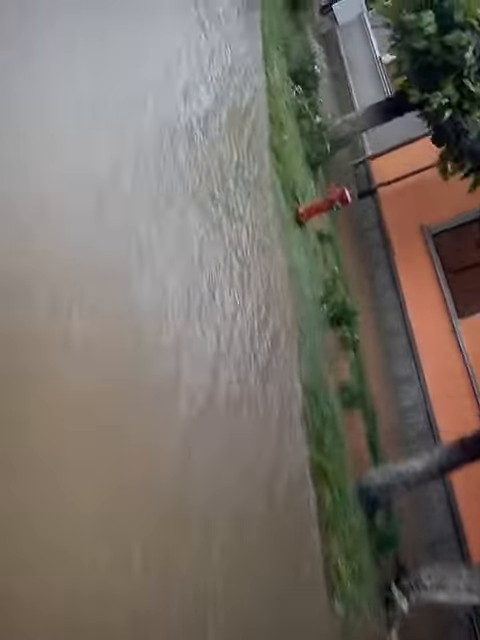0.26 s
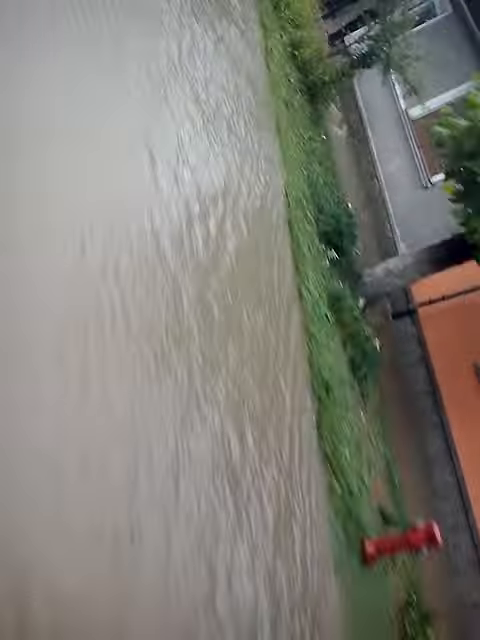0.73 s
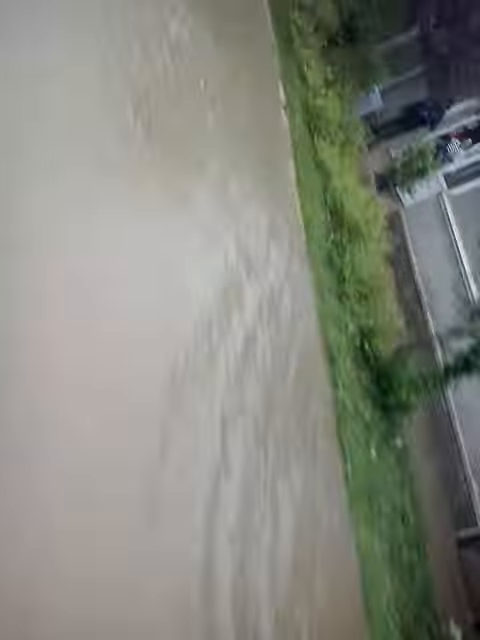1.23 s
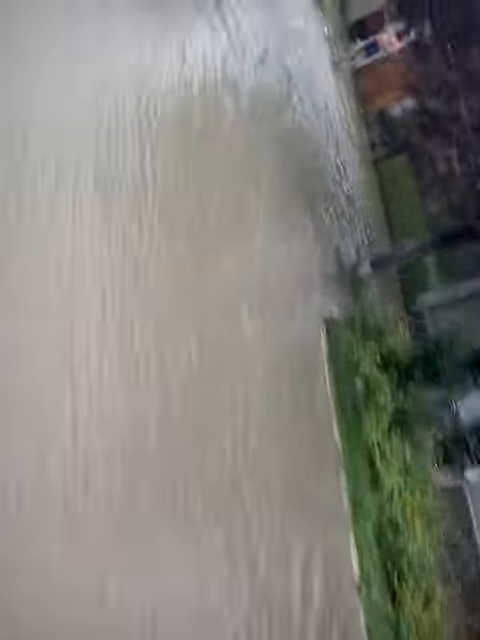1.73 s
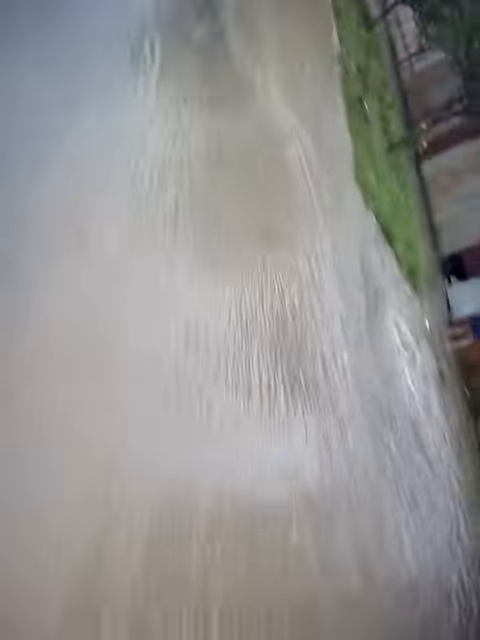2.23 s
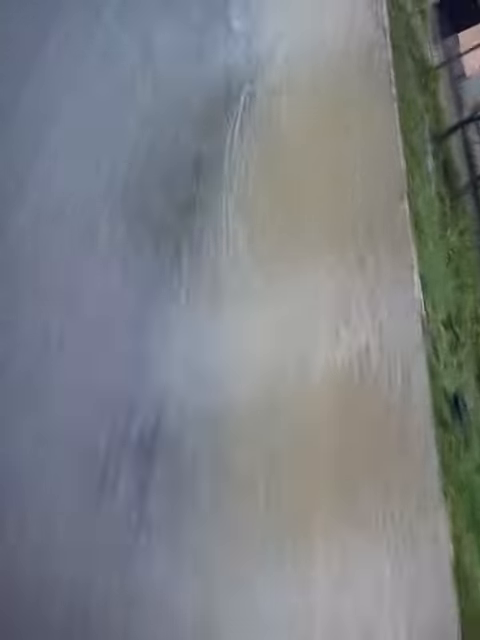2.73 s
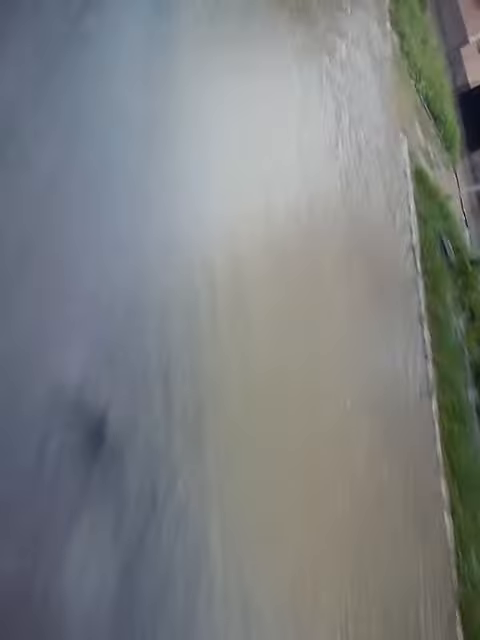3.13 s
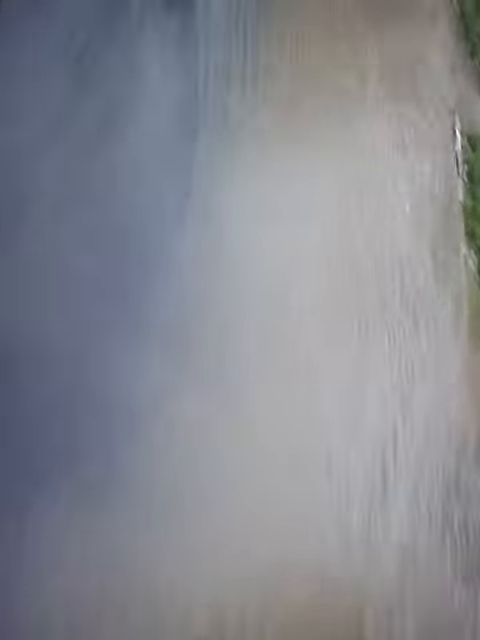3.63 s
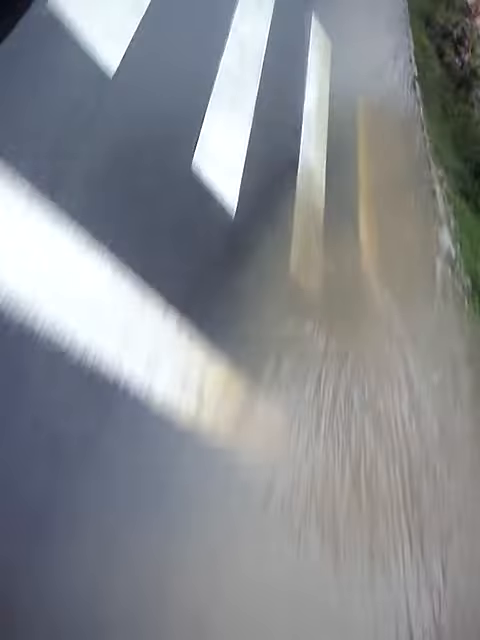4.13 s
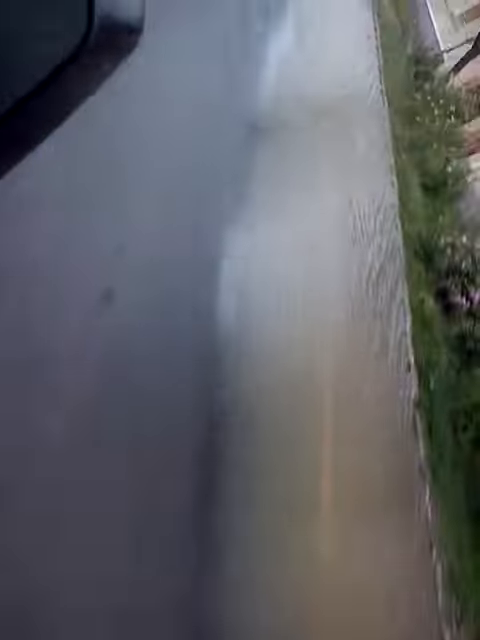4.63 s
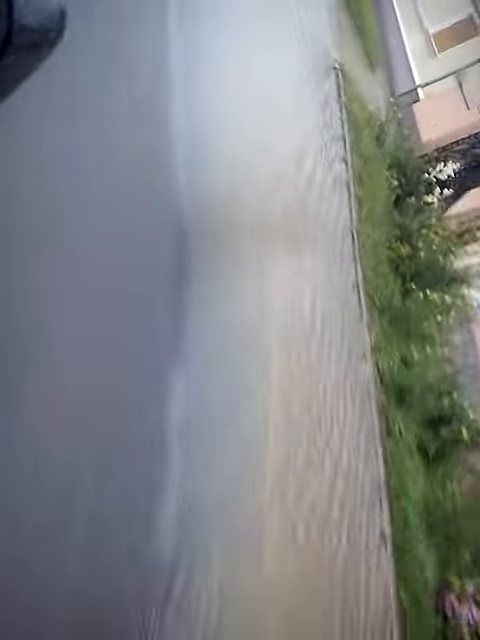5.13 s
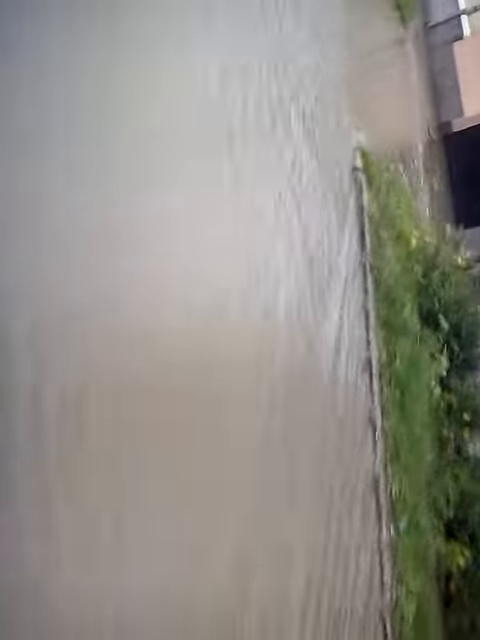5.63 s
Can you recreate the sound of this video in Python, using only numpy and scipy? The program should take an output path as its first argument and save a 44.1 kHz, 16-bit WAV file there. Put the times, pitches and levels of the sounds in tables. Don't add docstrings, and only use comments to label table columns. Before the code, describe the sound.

Tyres plough through flood water with a roaring, hissing rush while wind rumbles on the microphone, then the spray thins to popping, buffeting air.

```python
import sys
import numpy as np
from scipy import signal
from scipy.fft import rfft, irfft, next_fast_len
from scipy.io import wavfile
from scipy.ndimage import uniform_filter1d

SR = 44100
rng = np.random.default_rng(int(sys.argv[2]) if len(sys.argv) > 2 else 0)


def put_to_file(sound):
    columns = np.atleast_2d(sound).T
    safe = np.clip(columns, -1, 1)
    whole_steps = np.round(safe * 32767)
    wavfile.write(sys.argv[1], SR, whole_steps.astype(np.int16))


def voltage_ratio(decibels):
    exponent = np.asarray(decibels, float) / 20
    return 10 ** exponent


N = 258867
SIZE = next_fast_len(N + 4096)
BIN_HZ = np.maximum(np.arange(SIZE // 2 + 1) * SR / SIZE, 1)


def rms_one(x):
    return x / np.sqrt(np.mean(x ** 2) + 1e-20)


def in_time(rows):
    s, *columns = np.transpose(rows)
    return [np.interp(np.arange(N) / SR, s, column) for column in columns]


def swells(s, db, length):
    t = np.arange(0, N + 64, 64) / SR
    bells = np.exp(-((t[:, None] - s) / length) ** 2)
    return np.interp(np.arange(N) / SR, t, bells @ db)


def colour(x, points, below_db=-120, above_db=-120):
    hz, db = np.transpose(points)
    gain = voltage_ratio(np.interp(np.log(BIN_HZ), np.log(hz), db, below_db, above_db))
    return irfft(rfft(x, SIZE) * gain, SIZE)[:N]


def unit_spike(train, points):
    probe = np.zeros(N)
    probe[N // 2] = 1
    return colour(train, points) / np.max(colour(probe, points))


def drift(rate):
    r = np.exp(-32 * np.pi * rate / SR)
    noise = rng.standard_normal(N // 16 + 3002)
    slow = signal.lfilter([1], [1, -2 * r, r * r], noise)[3000:]
    return np.interp(np.arange(N) / 16, np.arange(len(slow)), rms_one(slow))


def turbulent(source, points, shared_db, own_db, shared_rate, own_rate):
    spectrum = rfft(colour(source, points), SIZE)
    together = shared_db * drift(shared_rate)
    place = 2 * np.log2(BIN_HZ)
    lowest = int(2 * np.log2(points[0][0]))
    highest = int(2 * np.log2(points[-1][0])) + 1
    out = np.zeros(N)
    for centre in range(lowest, highest + 1):
        share = np.cos(np.pi / 2 * np.clip(place - centre, -1, 1)) ** 2
        band = irfft(spectrum * share, SIZE)[:N]
        out += band * voltage_ratio(together + own_db * drift(own_rate))
    return rms_one(out)


def evened(x, span):
    power = uniform_filter1d(x ** 2, size=int(span * SR))
    return rms_one(x / np.sqrt(power + 0.054))


def grains(per_s, spread_db):
    sizes = voltage_ratio(spread_db * np.minimum(rng.exponential(1, N), 4))
    signs = rng.choice([-1, 1], N)
    return sizes * signs * (rng.random(N) < np.abs(per_s) / SR)


# (pitch [Hz], blur width [Hz], level over the wash [dB])
WHINE = [(1560, 22, -12), (2062, 14, -10), (2200, 30, -14)]
# (time [s], whine level [dB], speed [share of the mean])
LOAD = [
    (0, 0, .99),
    (1, 1, .997),
    (1.9, 1, 1.008),
    (2.7, -2, 1.015),
    (3.5, -8, 1.01),
    (5.87, -8, .997),
]


def whine():
    load_db, speed = in_time(LOAD)
    turns = 2 * np.pi * np.cumsum(speed) / SR
    tones = np.zeros(N)
    for hz, width_hz, db in WHINE:
        blurred = drift(width_hz) * np.cos(hz * turns) + drift(width_hz) * np.sin(hz * turns)
        tones += voltage_ratio(db) * blurred
    return voltage_ratio(load_db) * tones


# (time [s], bow wave level [dB], fine spray level [dB])
SPRAY = [(0.0, -24, -32), (1.54, -23, -31), (1.91, -24, -31.5), (2.35, -24.5, -27.5), (2.5, -24, -28.5),
         (2.63, -24.5, -30.5), (2.79, -29, -34.5), (3.09, -27.5, -35), (3.28, -27, -31.5), (3.38, -25, -28),
         (3.53, -31, -35), (3.69, -38, -40), (3.89, -35.5, -43), (4.07, -35.5, -42.5), (4.33, -29, -42),
         (4.54, -33.5, -46.5), (5.08, -35.5, -45.5), (5.87, -33, -43)]
# (time [s], swell, negative for a
# dip [dB])
HISS_SWELLS = [(.18, 5), (0.521, 3.5), (.65, 3), (.88, 3), (1.78, 1), (2.14, 2), (2.78, 0), (3.04, 3.5),
               (3.19, 5), (3.37, -1.5), (3.89, 3.5), (3.6, -3), (4.52, 3.5)]
# (frequency [Hz], level [dB per Hz])
WASH = [(500, -4.5), (900, -4.5), (1300, -5.5), (1600, -2.5), (2100, -0.5), (2300, -3.5), (2480, -6.5),
        (2620, -13.5), (3000, -17), (3800, -27.5), (5000, -22)]
# (frequency [Hz], level [dB per Hz])
FINE = [(2500, -18.5), (3500, -7.5), (4700, -6), (5400, -0.5), (6300, 0), (7000, -4.5), (8000, -1.5)]


def water():
    wash_db, fine_db = in_time(SPRAY)
    fine_db = fine_db + swells(*np.transpose(HISS_SWELLS), length=.02)
    wash = turbulent(rng.standard_normal(N), WASH, 0.49, 0.37, shared_rate=84, own_rate=37)
    drops = rms_one(colour(grains(2500, spread_db=5.0), WASH))
    fine = turbulent(rng.standard_normal(N), FINE, 0.6, 1.0, shared_rate=12, own_rate=130)
    roar = wash + voltage_ratio(-8.5) * drops + whine()
    return voltage_ratio(wash_db + 2.5) * roar + voltage_ratio(fine_db + 2.5) * fine


# (time [s], force [dB], swirl over the force [dB])
WIND = [(0, -22.5, -3), (.2, -21, -6.5), (.55, -19.5, -6.5), (.95, -16.5, -6), (1.3, -15, -7.5),
        (1.85, -18, -2.5), (1.95, -20, -6), (2.3, -17, -5), (2.62, -19.5, -1.5), (2.73, -20.5, -1),
        (3.05, -19, -0.5), (3.5, -14.5, -1), (3.68, -18, -4), (4.05, -18, -4), (4.42, -18, -1.5),
        (5.2, -18.5, -2), (5.45, -22.5, 2.5), (5.87, -18.5, -4.5)]
# (time [s], swell [dB], fineness [0 rumble to 1 flutter], length [s])
GUSTS = [(0.057, 4.5, 0.6, 0.056), (0.585, 5, 0.4, 0.019), (0.785, 9, 0.9, 0.015), (0.913, 4.5, 0.7, 0.029),
         (1.162, 4.5, 0.4, .03), (1.212, -2.5, 0, 0.025), (1.369, 4.5, 0.6, 0.023), (1.627, 4, 0.8, .04),
         (1.705, 4, 1, 0.026), (1.852, 8, 0.3, .05), (1.98, 7, 0.6, 0.023), (2.404, -10, 0.4, 0.023),
         (2.528, 3.5, .9, 0.027), (2.651, 7.5, 1, 0.039), (3.546, 5.5, 0.8, 0.011),
         (3.676, -3.5, 0.2, 0.025), (3.724, 5.5, .7, 0.034), (3.823, 10, 0.6, 0.014),
         (3.983, 2, 0.5, 0.018), (4.533, -2.5, .1, 0.045), (4.763, 3.5, 0.3, 0.0067),
         (4.833, -6.5, 0.2, 0.026), (4.873, 3, .5, 0.017), (4.99, 3, 0.3, 0.017), (5.251, 2.5, 0.2, 0.045),
         (5.57, -8, 0.4, 0.012), (5.648, 9.5, .3, 0.044), (5.854, 4, 0.5, 0.018), (5.87, 4.5, 0.5, 0.04)]
# (frequency [Hz], level [dB per Hz])
RUMBLE = [(13, -55.5), (22, -37), (62, -3.5), (91, 2), (173, -2.5), (400, -15.5), (520, -33), (880, -120)]
# (frequency [Hz], level [dB per Hz])
FLUTTER = [(150, -3.5), (300, 0), (500, 3), (1000, -4), (1600, -9.5), (2600, -29.5), (5000, -53)]
# (frequency [Hz], level [dB per Hz])
BURST = [(200, -17.5), (500, 1.5), (1200, 3.5), (2400, -15), (3200, -13.5), (4500, -27.5), (7000, -37.5)]
# (frequency [Hz], level [dB per Hz])
EDGE = [(2000, -29.5), (2600, 13), (3500, 5), (4600, -2), (6000, -9.5), (8000, -18.5)]


def wind():
    force_db, swirl_db = in_time(WIND)
    s, swell_db, fine, length = np.transpose(GUSTS)
    length = np.clip(length, .008, .2)
    rumble_db = force_db + swells(s, swell_db * np.cos(np.pi / 2 * fine), length)
    flutter_db = force_db + swirl_db + swells(s, swell_db * np.sin(np.pi / 2 * fine), length)

    spikes = rms_one(grains(400 * voltage_ratio(4 * drift(40)), spread_db=2))
    eddies = spikes + voltage_ratio(-0.5) * rng.standard_normal(N)
    rumble = turbulent(eddies, RUMBLE, 0.87, 0.49, shared_rate=11, own_rate=12)
    flutter = turbulent(eddies, FLUTTER, 1.83, 0.44, shared_rate=71, own_rate=33)
    rumble = voltage_ratio(rumble_db - 0.8) * evened(rumble, span=0.063)
    flutter = voltage_ratio(flutter_db - 2.5) * evened(flutter, span=0.054)

    ticks = grains(220 * voltage_ratio(5 * drift(13)), spread_db=3.4)
    tick_bodies = voltage_ratio(flutter_db + 9) * colour(ticks, BURST)
    tick_fronts = voltage_ratio(flutter_db - 15) * colour(ticks, EDGE)
    return rumble + flutter + tick_bodies + tick_fronts


# (time [s], peak [dB], swing [Hz], direction [+1 or -1])
SLAMS = [
    (1.1842, -4.6, 170, 1),
    (1.5925, -4.6, 150, 1),
    (2.6686, -6, 220, -1),
    (3.2971, -6.3, 200, 1),
    (3.3299, -3.5, 400, -1),
    (3.3946, -4, 200, 1),
    (3.4411, -8, 250, -1),
    (3.5491, -7.5, 150, 1),
    (5.8277, -5, 140, 1),
]


def slams():
    t = np.arange(N) / SR
    swing, taken = np.zeros((2, N))
    for s, db, hz, way in SLAMS:
        hump = np.exp(-(1.5 * hz * (t - s)) ** 2)
        swing += way * voltage_ratio(db + 1) * np.cos(2 * np.pi * hz * (t - s)) * hump
        taken += .85 * hump
    return swing, taken


# (time [s], peak [dB], sharpness [dB], push [dB])
POPS = [(3.112, -6, -25.5, -6.5), (3.204, -6, -31.5, -11.5), (3.328, 2.5, -21.5, -11),
        (3.44, -9.5, -17, -10), (3.452, 0.5, -23.5, -8.5), (3.523, -5, -21.5, -2), (3.548, -4.5, -15, -1),
        (3.587, -10.5, -21.5, -5), (3.62, -5, -28, -4), (3.804, -7, -24, -9.5), (3.814, -6, -20.5, -10.5),
        (3.837, -9.5, -21.5, -13), (3.852, -11.5, -19.5, -4.5), (4.008, -13.5, -40, -15.5),
        (4.182, -8.5, -26, -10), (4.199, -6.5, -28.5, -10), (4.287, -8.5, -27, -6.5),
        (4.371, -6.5, -23, -3.5), (4.478, -4.5, -22, -8.5), (4.514, -2, -15.5, -3.5), (4.556, -15, -13, -6),
        (4.575, -9, -16.5, -9.5), (4.6, -10.5, -17, -3), (4.732, -22.5, -21, -2), (4.774, -6, -14.5, -0.5),
        (5.003, -9.5, -20, 0), (5.187, -19, -18, -5), (5.219, -7, -22.5, -1), (5.646, -14.5, -22, -3.5),
        (5.668, -13, -19.5, -4)]
# (time [s], peak [dB], sharpness [dB])
CRACKLE = [(3.048, -17, -23.5), (3.342, -12, -19.5), (3.612, -6, -22), (3.735, -14, -24),
           (3.824, -17, -21.5), (3.878, -11.5, -23), (4.07, -15, -27), (4.25, -15.5, -31.5),
           (4.338, -9, -25.5), (4.358, -10, -21), (4.388, -12.5, -20), (4.403, -14.5, -21),
           (4.415, -14.5, -18), (4.438, -11, -28.5), (4.454, -4, -25), (4.489, -18.5, -11.5),
           (4.53, -16.5, -14), (4.745, -17.5, -13.5), (4.842, -11, -26), (4.915, -12.5, -19),
           (5.014, -17.5, -24.5), (5.059, -14, -23.5), (5.147, -11, -24), (5.168, -13.5, -19),
           (5.184, -8, -15.5), (5.228, -13.5, -20.5), (5.237, -17, -25), (5.31, -12.5, -24.5),
           (5.531, -9, -31), (5.548, -12.5, -25.5)]
# (frequency [Hz], level [dB per Hz])
BODY = [(450, -26.5), (700, 5.5), (1200, 1.5), (2300, -3.5), (2900, -34.5)]
# (frequency [Hz], level [dB per Hz])
THUMP = [(80, -23), (170, 9), (400, -2.5), (700, -1.5), (1000, -36)]


def pops():
    spread_s, rise_s = .002, .0015
    half = 400
    t = np.arange(-half, half + 1) / SR
    rows = [(s, db - 1, sharp_db, push_db - 5) for s, db, sharp_db, push_db in POPS]
    rows += [(s, db - 2.5, sharp_db, -2) for s, db, sharp_db in CRACKLE]
    ragged = rng.standard_normal((len(rows), len(t))) ** 3
    body, edge, push = np.zeros((3, N + len(t)))
    for (s, db, sharp_db, push_db), rough in zip(rows, ragged):
        i = round((s + rise_s) * SR) - half
        shape = rough * (t > -.0004) * np.exp(-(t / spread_s) ** 2)
        shape = .75 * shape / np.sqrt(np.sum(shape ** 2)) - 1.6 * (t == 0)
        body[i:i + len(t)] += voltage_ratio(db - 1.5) * shape
        edge[i:i + len(t)] += voltage_ratio(db + sharp_db + 7.5) * shape
        push[i + half] -= voltage_ratio(db + push_db + 2.0)
    bursts = unit_spike(body[:N], BODY) + unit_spike(push[:N], THUMP)
    fronts = unit_spike(edge[:N], EDGE)
    return bursts, fronts


def scene():
    bass_cut_hz, swing_cut_hz, vent_hz = 46.4, 700, 26
    port_limit = .66
    water_and_wind = water() + wind()
    bursts, fronts = pops()
    bass_cut = signal.butter(2, bass_cut_hz, "high", fs=SR, output="sos")
    flow = signal.sosfilt(bass_cut, water_and_wind + bursts)
    flow = flow / (1 + np.abs(flow / port_limit) ** 6) ** (1 / 6) + fronts
    lows = signal.sosfiltfilt(signal.butter(2, swing_cut_hz, fs=SR, output="sos"), flow)
    swing, taken = slams()
    vent = signal.butter(2, vent_hz, "high", fs=SR, output="sos")
    return signal.sosfiltfilt(vent, flow - taken * lows + swing)[None]


def band_limit(x):
    return signal.sosfilt(signal.butter(12, 15850, fs=SR, output="sos"), x)


# (frequency [Hz], level [dB])
TOP = [(6800, 2.5), (7200, -4.5), (7500, -15.5), (7750, -30), (7950, -57)]
# (frequency [Hz], level [dB])
MIRROR = [(7900, -30), (8200, -3), (8600, -19.5), (8900, -32), (9150, -46.5), (9300, -65)]


def record(dry):
    phone_rate_hz = 16000
    converter_top, clip = .8, .705
    x = colour(np.clip(dry[0], -converter_top, converter_top), TOP, below_db=-0.5)
    carrier = 2 * np.cos(2 * np.pi * phone_rate_hz * np.arange(N) / SR)
    x += colour(x * carrier, MIRROR)
    return band_limit(np.clip(x, -clip, clip)[None])


dry = scene()
out = record(dry)
put_to_file(out)
```